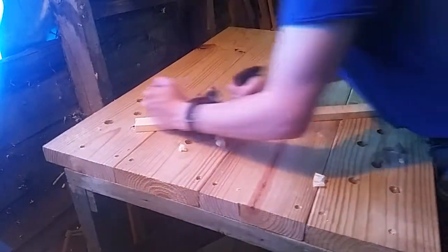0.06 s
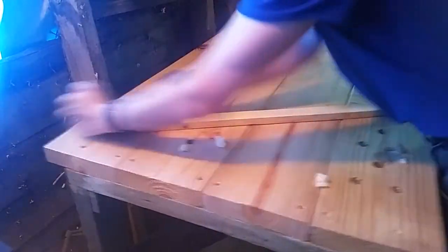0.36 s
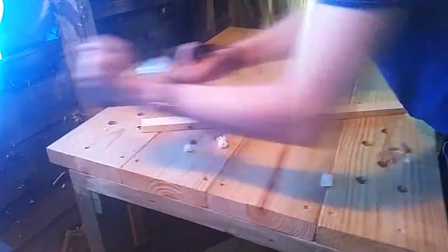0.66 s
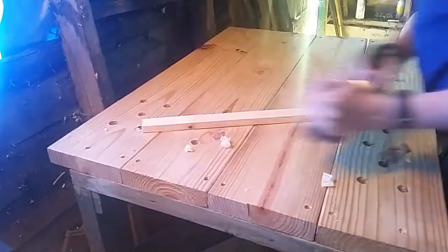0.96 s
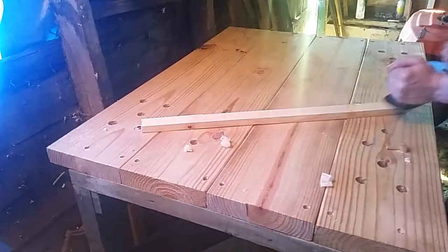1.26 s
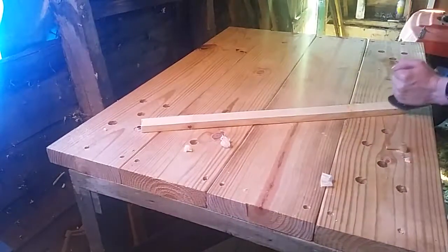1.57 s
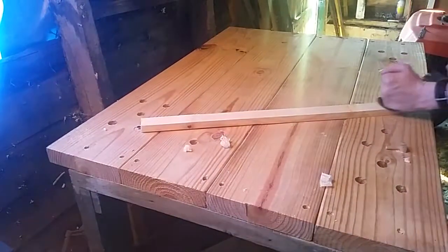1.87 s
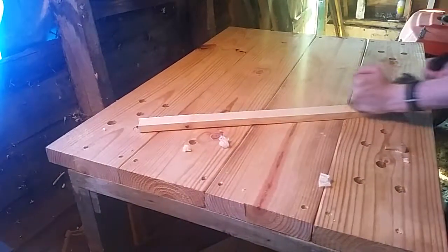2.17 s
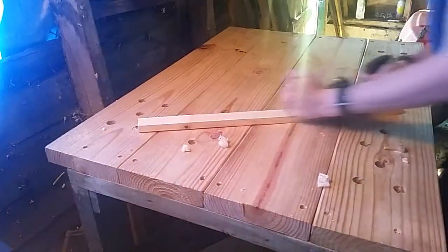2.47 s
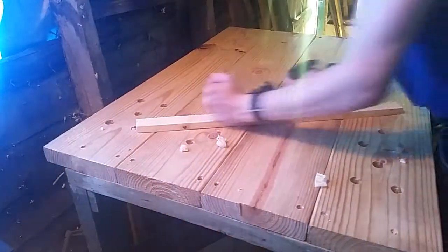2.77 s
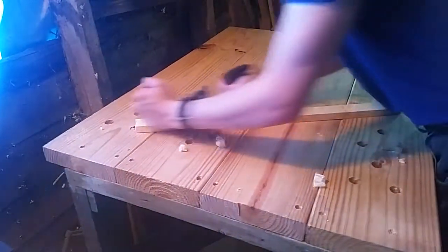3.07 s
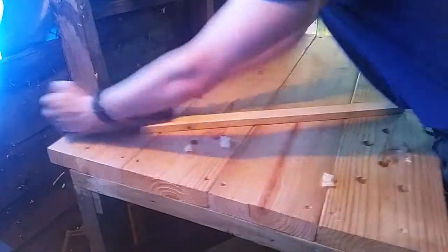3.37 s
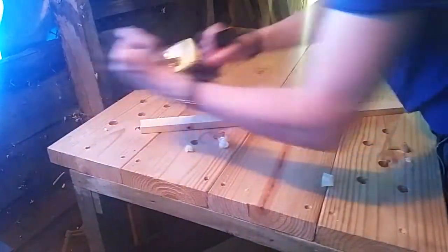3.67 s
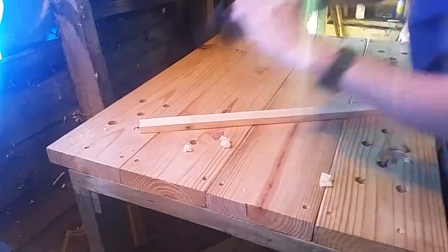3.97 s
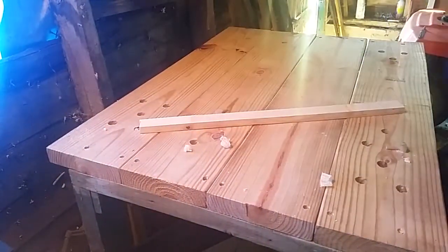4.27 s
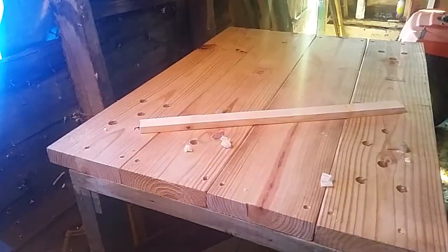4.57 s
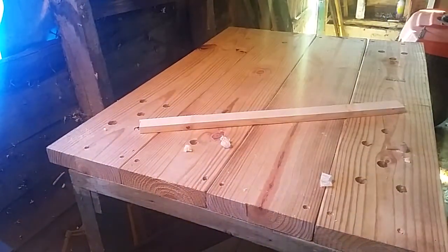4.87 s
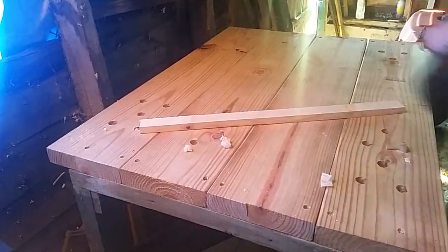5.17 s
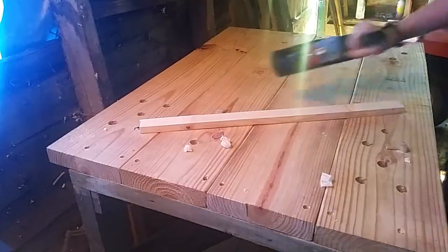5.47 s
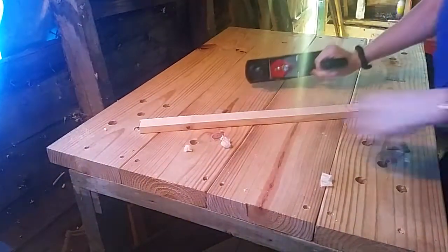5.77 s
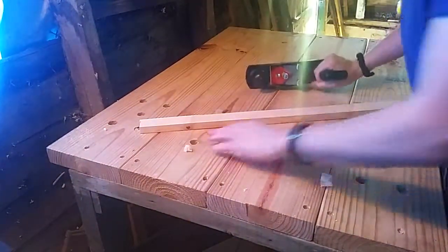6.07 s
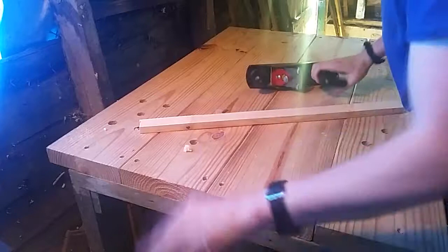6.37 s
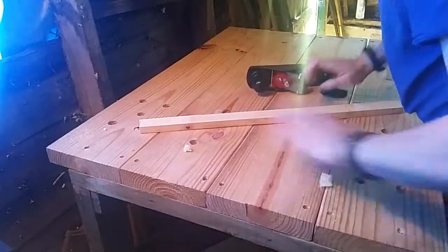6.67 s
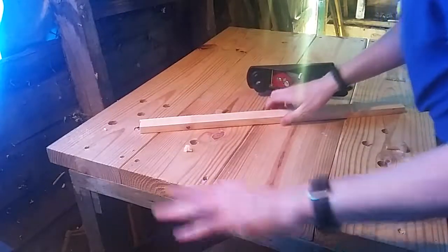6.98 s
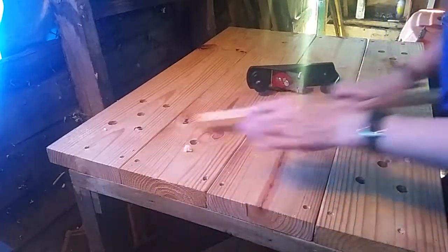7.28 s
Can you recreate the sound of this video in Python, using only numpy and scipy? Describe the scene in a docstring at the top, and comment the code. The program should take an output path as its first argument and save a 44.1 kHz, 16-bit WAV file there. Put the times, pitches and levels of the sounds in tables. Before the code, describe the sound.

A short, hissing scrape of a hand plane on wood ends in a sharp clack, heard from nearby in a small wooden shed. The plane is set back with soft taps and pushed through a second stroke that grows louder, its blade juddering. Thin shavings crackle, then a cluster of wooden knocks sets the workbench rocking. A quick rustle and a faint slide of wood finish it.

```python
"""In a small shed a hand plane tears fibres from a thin wooden strip, its blade chattering by stick-slip.
It runs off the end with a clack and the bench rocks. The plane is set back, lined up and pushed through
a longer stroke, and the bench rocks again. Shavings crinkle and snap as they are pulled from its mouth.
The plane is laid down with a few knocks that excite the modes of the bench and rock it once more.
Last, a hand sweeps the bench and takes up the strip."""
import sys
import numpy as np
from scipy import signal
from scipy.fft import rfft, irfft, next_fast_len
from scipy.io import wavfile

SR = 44100
rng = np.random.default_rng(int(sys.argv[2]) if len(sys.argv) > 2 else 0)


def waveform_to_disk(signal):
    """Save audio, clipped to [-1, 1], as 16-bit WAV at the path in sys.argv[1]."""
    frames = np.transpose(np.atleast_2d(signal))
    scaled = np.clip(frames, -1, 1) * 32767
    samples = np.round(scaled).astype(np.int16)
    wavfile.write(sys.argv[1], SR, samples)


N = 332514
TIME = np.arange(N) / SR

# pushes of the plane, one list each: (time [s], bite of the blade [dB], drag of the sole [dB])
STROKES = [
    [(0, -23.5, -28.5), (.14, -25.5, -30.5), (.225, -16.5, -23.5), (.345, -17.5, -19.5)],
    [(2.05, -54.5, -43.5), (2.16, -31, -29), (2.38, -31, -43.5), (2.54, -41, -45), (2.68, -38, -42),
     (2.77, -27, -31.5), (2.9, -25.5, -30), (3.07, -21.5, -33), (3.2, -21, -20.5), (3.3, -17, -25)],
]
# spectrum of the dragging sole: (frequency [Hz], relative level [dB])
SCRAPE_SPECTRUM = [(250, -9.5), (450, -1.5), (650, 6), (950, 0.5), (1300, -5.5), (1700, -41.5), (3000, -45)]
# spectrum of tearing fibres: (frequency [Hz], relative level [dB])
RASP_SPECTRUM = [(800, -15.5), (1400, -0.5), (1900, 0.5), (2700, -4), (3500, -0.5), (4500, -8),
                 (6500, -23.5), (11000, -51)]
# spectrum of the peeling shaving: (frequency [Hz], relative level [dB])
HISS_SPECTRUM = [(2500, -72), (4500, -1.5), (6000, 2), (7600, 2.5), (8300, 6), (10200, -1), (12500, 2),
                 (15000, -1.5)]
# spectrum of the shaken bench: (frequency [Hz], relative level [dB])
RUMBLE_SPECTRUM = [(30, -24.5), (75, 9.5), (120, 1), (210, 11), (290, -2.5), (370, 11), (600, -31)]
# resonances of plane and strip: (frequency [Hz], width [Hz], relative level [dB])
PLANE_MODES = [(551.5, 62, 9), (900, 26, 5), (993, 540, 4.5), (1051, 40, 9), (1150, 70, 8.5),
               (1345, 61.4, 11), (1980, 260, -4), (2314, 140, 1.5), (3200, 81, 3.5), (3430, 55, 4),
               (3890, 400, -3), (5670, 700, -11)]
# the blade catches in hard grain: (time [s], relative level [dB])
CATCHES = [(2.349, -21), (3.084, -17)]
# spells of blade chatter: (start [s], length [s], top pitch [Hz], width [Hz], relative level [dB])
CHATTER_SPELLS = [(0, 0.27, 3595, 290, -29.5), (0.267, 0.06, 3560, 200, -23),
                  (2.736, 0.29, 1200, 302, -28.5), (2.985, 0.29, 3480, 230, -31),
                  (3.15, 0.16, 1030, 320, -32), (3.238, 0.075, 3610, 220, -26)]
# reverberation of the shed: (frequency [Hz], 60 dB decay time [s])
SHED_DECAY = [(60, 0.77), (300, 0.23), (1000, 0.21), (4000, 0.23), (15000, 0.028)]
# spectrum of still air and microphone hiss: (frequency [Hz], relative level [dB])
AIR_SPECTRUM = [(20, -19), (45, 2), (70, 3), (100, -1), (180, -1.5), (400, -12), (800, -18), (1400, -29),
                (2200, -27), (3000, -39), (3900, -26.5), (5100, -31.5), (6050, -53), (6850, -30.5),
                (7400, -46.5), (8800, -40.5), (11400, -50), (12200, -40), (13500, -66)]
# shavings flicked, pulled out and swept away: (peak time [s], relative level [dB], rise [s], fall [s])
SHAVING_MOVES = [(.56, -52.5, 0.16, 0.53), (2.62, -25, 0.043, 0.08), (4.09, -49, 0.14, 0.13),
                 (4.42, -39.5, 0.33, 0.58), (4.486, -24, 0.061, 0.07), (4.569, -16.5, 0.029, 0.072),
                 (4.735, -28, 0.044, 0.08), (5.299, -45, 0.25, 0.26), (6.28, -51.5, 0.12, 0.27),
                 (6.856, -17.5, 0.037, 0.054), (7.125, -36, 0.049, 0.12), (7.49, -47.5, 0.064, 0.085)]
# single snaps of a shaving: (time [s], relative level [dB])
SNAPS = [(4.336, -18.5), (4.368, -25), (4.404, -23), (4.468, -12), (4.558, -6), (6.819, -14)]
# spectrum of crinkling shavings: (frequency [Hz], relative level [dB])
RUSTLE_SPECTRUM = [(900, -16.5), (1700, -20), (3000, -12.5), (4300, -9), (9000, -5), (11000, -4.5),
                   (15000, -7.5)]
# knocks on the bench: (time [s], level [dB], contact cutoff [Hz], ring against clatter [dB])
KNOCKS = [(0.47, -15, 12700, -4.5), (.486, -21, 745, -10), (1.607, -37, 1290, 5.5), (1.633, -25.5, 111, 14),
          (1.662, -25.5, 1520, 4), (2.004, -30.5, 215, 9), (2.696, -23.5, 756, 4.5), (5.923, -14.5, 392, 6),
          (6.117, -24.5, 200, 7), (6.185, -23, 460, 3.5), (6.370, -18.5, 600, 4), (6.45, -13, 380, 11),
          (6.475, -17.5, 680, 8), (6.495, -12.5, 646, 9), (6.511, -15.5, 243, 4.5)]
# modes of the bench: (frequency [Hz], relative level [dB], 60 dB decay time [s])
BENCH_MODES = [(68.6, 2, 0.93), (78.16, 2, 0.78), (158.9, 6.5, 0.27), (222, -12, 0.093), (264.3, -10, 0.2),
               (330, -26.5, 0.079), (372.4, 5.5, 0.34), (549, 3.5, 0.26), (696, -2, 0.2), (792, 4, 0.15),
               (976, -2.5, 0.29), (1295, -6.5, 0.28), (1726, -3, .15)]
# spectrum of a blow's clatter: (frequency [Hz], relative level [dB])
CLATTER_SPECTRUM = [(30, -34), (55, -11), (90, -4), (170, 1.5), (380, 3.5), (480, -4), (780, 1),
                    (2500, -11.5), (4200, -16.5), (8000, -17.5), (15000, -23.5)]
# rocking of the bench after a shove:
# (start [s], period [s], second foot's delay [s], level [dB], loss [dB/swing], ring against clatter [dB])
ROCKING = [(0.725, .252, 0.092, -34, 7.5, 1), (3.404, .268, .074, -31.5, 6.5, 1),
           (6.627, .208, .055, -26, 0.96, 13.5)]
# the plane is lined up, the strip picked up: (peak time [s], relative level [dB], rise [s], fall [s])
SLIDES = [(1.92, -54.5, 0.18, .1), (1.99, -40, 0.049, 0.041), (7.15, -49, 0.52, 0.62)]

BITE, DRAG = 1, 2  # columns of STROKES
CUT_RUN_OUT_DB, PEEL_RUN_OUT_DB = -15, -6.5  # past the end the cut stops, but the shaving slides on


def gain_of(db):
    """Decibels express an amplitude ratio logarithmically."""
    return 10 ** (np.asarray(db) / 20)


def unit_rms(x):
    """Normalisation to unit mean power."""
    return x / np.sqrt(np.mean(x ** 2) + 1e-20)


def curve_at(points, hz):
    """Linear interpolation over log frequency."""
    point_hz, value = np.transpose(points)
    return np.interp(np.log(hz + 1), np.log(point_hz + 1), value)


def add(mix, start_s, sound):
    """Superposition: a sound adds to the mix from its onset."""
    part = mix[max(round(start_s * SR), 0):][:len(sound)]
    part += sound[:len(part)]


def colour(x, spectrum):
    """Linear filtering: each frequency is weighted by a spectral envelope."""
    size = next_fast_len(len(x) + 2048)
    response = gain_of(curve_at(spectrum, np.fft.rfftfreq(size, 1 / SR)))
    return irfft(rfft(x, size) * response, size)[:len(x)]


def resonate(x, hz, width_hz, order=1):
    """Resonance of unit gain about a pitch that may move; cascaded stages steepen its flanks."""
    carrier = np.exp(2j * np.pi * np.cumsum(hz * np.ones(len(x))) / SR)
    pole = np.exp(-np.pi * width_hz / SR)
    baseband = x * carrier.conj() + 1e-18
    for _ in range(order):
        baseband = signal.lfilter([1 - pole], [1, -pole], baseband)
    return 2 * (carrier * baseband).real


def wander(cutoff_hz):
    """Low-passed noise: a smooth random fluctuation of unit rms."""
    size = next_fast_len(N, real=True)
    rolloff = 1 + (np.fft.rfftfreq(size, 1 / SR) / cutoff_hz) ** 4
    return unit_rms(irfft(rfft(rng.standard_normal(size)) / rolloff, size)[:N])


def crackle(per_s, spread_db, clump_db, clump_hz):
    """Shot noise: tiny independent fractures of uneven size, swelling in clumps."""
    sizes = gain_of(spread_db * np.minimum(rng.exponential(1, N), 4))
    clicks = sizes * rng.choice([-1, 1], N) * (rng.random(N) < per_s / SR)
    return unit_rms(clicks * gain_of(clump_db * wander(clump_hz)))


def swell(peak_s, db, rise_s, fall_s):
    """Near-Gaussian envelope of one movement, 20 dB down at rise_s before and fall_s after its peak."""
    away = np.maximum((peak_s - TIME) / rise_s, (TIME - peak_s) / fall_s)
    return gain_of(db - 20 * np.minimum(away, 10) ** 1.94)


def stroke_envelope(column, run_out_db, run_out_s=0.071, decay_db_per_s=333):
    """Amplitude envelope of the strokes: each sags as the plane runs out, then decays exponentially."""
    total = np.zeros(N)
    for rows in map(np.array, STROKES):
        start, end = rows[0, 0], rows[-1, 0]
        push_db = np.interp(TIME, rows[:, 0], rows[:, column])
        run_out = np.clip((TIME - end) / run_out_s, 0, 1) ** 0.24  # most of the drop comes at once
        lifted_s = abs(TIME - np.clip(TIME, start, end + run_out_s))
        total += gain_of(push_db + run_out_db * run_out - decay_db_per_s * np.minimum(lifted_s, 1))
    return total


def planing():
    """Forced vibration: friction of the sole and fracture of fibres drive plane, shaving and bench."""
    fibres = crackle(per_s=9000, spread_db=0, clump_db=1.1, clump_hz=120)
    curl = crackle(per_s=13000, spread_db=-1, clump_db=-1.2, clump_hz=190)
    low_ring, high_ring = np.zeros((2, N))
    for hz, width_hz, db in PLANE_MODES:
        moving_hz = hz * (1 + 0.0084 * wander(2.4))  # the pitches shift as the plane travels
        mode = gain_of(db) * resonate(fibres, moving_hz, width_hz, order=2)
        add(low_ring if hz < 1500 else high_ring, 0, mode)
    scrape = unit_rms(unit_rms(colour(fibres, SCRAPE_SPECTRUM)) + gain_of(-2.5) * unit_rms(low_ring))
    rasp = unit_rms(unit_rms(colour(fibres, RASP_SPECTRUM)) + gain_of(-9) * unit_rms(high_ring))
    hiss = unit_rms(colour(curl + 0.86 * fibres, HISS_SPECTRUM))
    rumble = unit_rms(colour(fibres, RUMBLE_SPECTRUM))
    drag = stroke_envelope(DRAG, CUT_RUN_OUT_DB)
    peel = stroke_envelope(BITE, PEEL_RUN_OUT_DB) ** 0.96
    catches = sum(swell(peak_s, db, rise_s=0.013, fall_s=0.02) for peak_s, db in CATCHES)
    cut = stroke_envelope(BITE, CUT_RUN_OUT_DB) + catches
    return (gain_of(-3) * (scrape * drag + rasp * cut) + gain_of(-4) * hiss * peel
            + gain_of(-18.5) * rumble * drag ** 0.6)  # even a light drag shakes the bench


def chatter():
    """Stick-slip of the blade: a rough, narrow note whose pitch and level follow one arch per spell."""
    out = np.zeros(N)
    for start_s, length_s, top_hz, width_hz, db in CHATTER_SPELLS:
        t = np.arange(0, length_s, 1 / SR)
        arch = abs(np.sin(np.pi * t / length_s))
        slips = rng.standard_normal(SR)[:len(t)]
        hz = top_hz * (1 - 0.051 * (1 - arch))
        note = unit_rms(resonate(slips, hz, width_hz, order=2))
        add(out, start_s, note * gain_of(db) * arch ** 0.3)
    return out


def sizzle(rubbing):
    """Amplitude modulation: a thin, high noise band follows the rubbing, most exposed when it is light."""
    band = resonate(rng.standard_normal(N), hz=8647, width_hz=250, order=2)
    return unit_rms(band) * rubbing ** 0.78


def shed_echoes(hold_s):
    """Reverberation: dense reflections between close walls hold briefly, then decay band by band."""
    hz, t, bands = signal.stft(rng.standard_normal(2 ** 15), SR, nperseg=256)
    decay = gain_of(-60 * np.maximum(t - hold_s, 0) / curve_at(SHED_DECAY, hz)[:, None])
    tail = signal.istft(bands * decay, SR)[1]
    return tail / np.linalg.norm(tail)


def air():
    """Noise floor: still air and microphone hiss, slightly uneven in level."""
    noise = unit_rms(colour(rng.standard_normal(N), AIR_SPECTRUM))
    return gain_of(-44.5) * noise * gain_of(0.13 * wander(12))


def shaving_motion(settle_db=-44.5, settle_db_per_s=29):
    """Relaxation: shavings settle in the plane's mouth after each stroke; moves of the hand stir them."""
    ends = [rows[-1][0] for rows in STROKES]
    settling = sum((TIME > end) * gain_of(settle_db - settle_db_per_s * abs(TIME - end)) for end in ends)
    return settling + sum(swell(*move) for move in SHAVING_MOVES)


def shavings(motion, snap_s=0.00055):
    """Crackling noise: thin curls of wood crinkle in many tiny breaks and a few louder snaps."""
    breaks = crackle(per_s=12000, spread_db=5, clump_db=3, clump_hz=90) * motion
    t = np.arange(SR // 50) / SR
    for start_s, db in SNAPS:
        add(breaks, start_s, gain_of(db) * rng.choice([-1, 1], len(t)) * np.exp(-t / snap_s))
    return colour(breaks, RUSTLE_SPECTRUM)


def bench_ring(t, thump_db=4):
    """Damped normal modes, weighted at random for the place of the blow; the first swings die fastest."""
    weights_db = rng.uniform(-2.5, 2.5, len(BENCH_MODES))
    signs = rng.choice([-1, 1], len(BENCH_MODES))
    modes = sum(sign * gain_of(db + weight_db - 60 * t / t60) * np.sin(2 * np.pi * hz * t)
                for (hz, db, t60), weight_db, sign in zip(BENCH_MODES, weights_db, signs))
    return modes * gain_of(thump_db * np.exp(-(t / 0.055) ** 4))


def blow(db, cutoff_hz, ring_db, hold_s, tick_db, rise_cycles):
    """Impact: the bench rings and the shed clatters; the softer the contact, the lower its cutoff."""
    clatter = colour(shed_echoes(hold_s), CLATTER_SPECTRUM)
    t = np.arange(len(clatter)) / SR
    hz = np.fft.rfftfreq(len(t), 1 / SR)
    contact = 1 / np.sqrt(1 + (hz / cutoff_hz) ** 7) + gain_of(tick_db) / (1 + hz / cutoff_hz)
    clatter, ring = (unit_rms(irfft(rfft(part) * contact, len(t))[:SR * 2 // 3])
                     for part in (clatter, bench_ring(t)))
    rise_s = 0.0016 + rise_cycles / cutoff_hz  # time to spread through the bench, longer if soft
    onset = 1 - np.exp(-(t[:len(ring)] / rise_s) ** 2)
    sound = (clatter + gain_of(ring_db) * ring) * onset
    return gain_of(db) * sound / np.std(sound[:SR // 30])


def knocks():
    """Impulsive excitation: the plane and the hands strike the bench."""
    out = np.zeros(N)
    for start_s, db, cutoff_hz, ring_db in KNOCKS:
        add(out, start_s, blow(db, cutoff_hz, ring_db, hold_s=0.0085, tick_db=-13.5, rise_cycles=0.32))
    return out


def rocking(swings=5, first_foot_hz=277, second_foot_hz=351):
    """Damped oscillation: the bench lands softly on one foot, then the other, weaker at each swing."""
    out = np.zeros(N)
    for start_s, period_s, delay_s, db, loss_db, ring_db in ROCKING:
        for late_s, foot_db, cutoff_hz in ((0, 0, first_foot_hz), (delay_s, -2, second_foot_hz)):
            bump = blow(db + foot_db, cutoff_hz, ring_db, hold_s=0.006, tick_db=-6.5, rise_cycles=0.94)
            for swing in range(swings):
                add(out, start_s + swing * period_s + late_s, gain_of(-swing * loss_db) * bump)
    return out


def wood_slide(motion):
    """Sliding friction: wood rubs lightly on wood."""
    grain = crackle(per_s=8000, spread_db=2, clump_db=1.5, clump_hz=80)
    scrape, rasp, hiss = (unit_rms(colour(grain, spectrum))
                          for spectrum in (SCRAPE_SPECTRUM, RASP_SPECTRUM, HISS_SPECTRUM))
    return unit_rms(scrape + 0.64 * rasp + 0.81 * hiss) * motion


def scene():
    """Superposition of the direct sound of the work and its reflections from the shed walls."""
    stirring = shaving_motion()
    sliding = sum(swell(*move) for move in SLIDES)
    rubbing = stirring + stroke_envelope(BITE, PEEL_RUN_OUT_DB) + sliding
    work = planing() + gain_of(3.5) * chatter() + shavings(stirring) + wood_slide(sliding)
    work += gain_of(-27.5) * sizzle(rubbing)
    walls = signal.fftconvolve(work, shed_echoes(hold_s=0.001))[:N]
    return (gain_of(-0.5) * work + gain_of(-8) * walls + knocks() + rocking() + air())[None]


def record(dry):
    """Resonance of the microphone port lifts the treble; a low-pass filter then limits the band."""
    sound = dry[0] + gain_of(3) * resonate(dry[0], hz=8870, width_hz=800)
    low_pass = signal.firwin(401, cutoff=14680, window=("kaiser", 9), fs=SR)
    return signal.oaconvolve(sound, low_pass, "same")[None]


dry = scene()
out = record(dry)
waveform_to_disk(out)
```